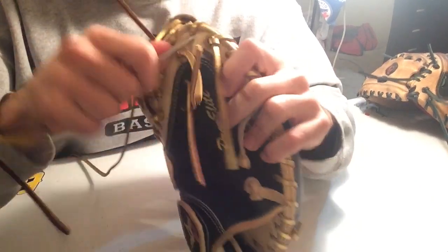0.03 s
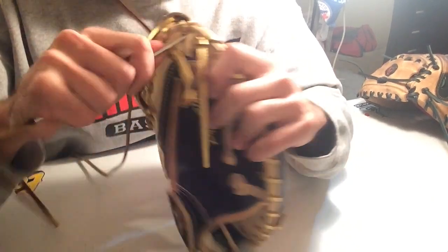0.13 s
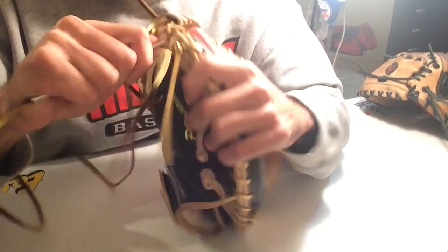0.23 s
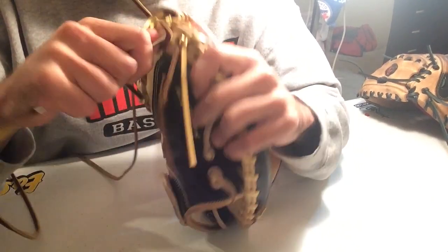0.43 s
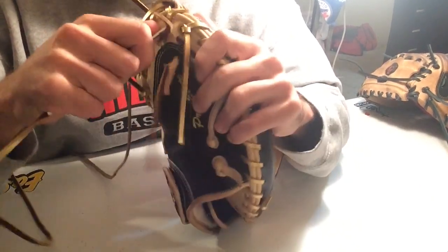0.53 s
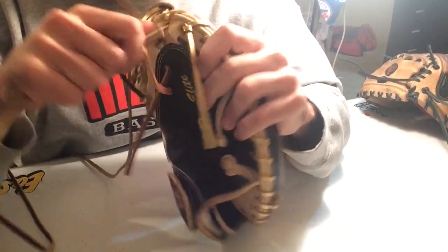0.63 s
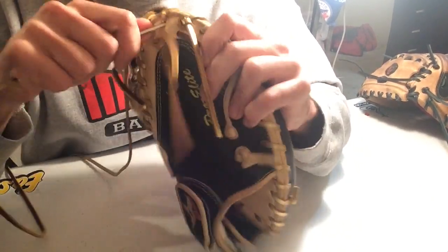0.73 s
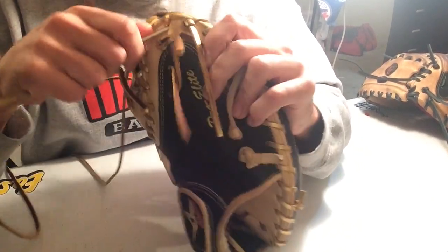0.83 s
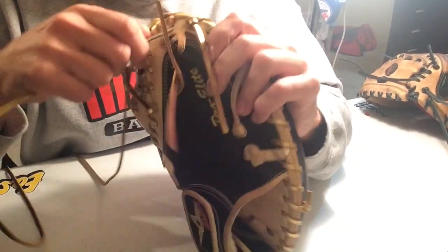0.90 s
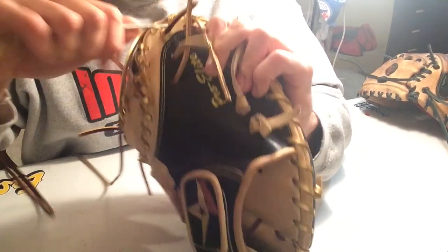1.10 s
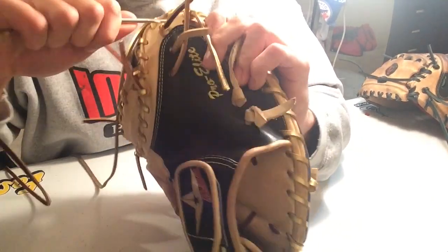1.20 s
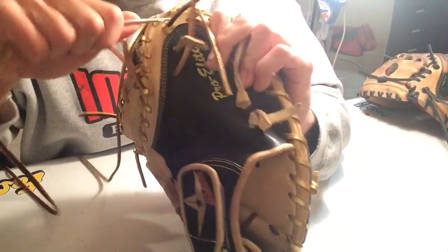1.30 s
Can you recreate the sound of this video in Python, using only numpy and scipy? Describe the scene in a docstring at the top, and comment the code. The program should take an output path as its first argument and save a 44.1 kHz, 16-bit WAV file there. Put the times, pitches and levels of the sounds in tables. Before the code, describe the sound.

A leather mitt scuffs and judders over a tabletop, close up in a quiet room. At about 0.3 seconds it knocks down with a sharp snap and a low thump, the loudest moment. From 0.5 seconds hands rub the leather faintly, with soft finger bumps and a dull tap near 0.75. The pulled lace ticks quickly between 0.8 and 1 second, and light rubbing continues until about 1.3.

```python
"""Leather mitt on a table

Close up in a quiet room, a leather mitt scuffs and judders over a tabletop, sticking and slipping.
It knocks down: a stiff edge snaps, then its weight rings the table with a low thump.
Hands and lace rub the hollow leather, fingers bump the padding and tap the rim,
and the lace slips in a short run of ticks as it is pulled."""
import sys
import numpy as np
from scipy import signal
from scipy.fft import rfft, irfft, next_fast_len
from scipy.io import wavfile
from scipy.ndimage import map_coordinates

SR = 44100
rng = np.random.default_rng(int(sys.argv[2]) if len(sys.argv) > 2 else 0)


def master_out(mix):
    """Clip the mix to full scale and print it as 16-bit PCM to the path in sys.argv[1]."""
    frames = np.transpose(np.atleast_2d(mix))
    ceiling = np.clip(frames, -1, 1)
    pcm = np.round(ceiling * 32767).astype(np.int16)
    wavfile.write(sys.argv[1], SR, pcm)


N = 59535

# colour of the room tone (f/Hz, level/dB)
ROOM_TONE_COLOUR = [(20, -38), (50, -7), (100, -5.5), (250, -19), (450, -17.5), (1000, -21), (2000, -31.5),
                    (5000, -37), (7300, -33), (9000, -38), (15500, -40.5)]
# the room's tail: colour (f/Hz, level/dB) and decay (f/Hz, t60/s)
TAIL_COLOUR = [(100, 1), (400, -4), (1200, -6), (4000, 4.5), (8000, -14), (15000, -2.5)]
TAIL_DECAY = [(200, 0.39), (1500, 0.061), (5000, 0.047), (14000, 0.12)]
# faint high background hiss: envelope (t/s, level/dB) and colour (f/Hz, level/dB)
HIGH_HISS_ENVELOPE = [(0, -81), (.1, -72.5), (.25, -73), (.45, -89), (.9, -83), (1.06, -79), (1.2, -81.5),
                      (1.27, -92.5)]
HIGH_HISS_COLOUR = [(2000, -28), (5000, -8), (7300, -0.5), (9000, -7), (15500, -12.5)]
# resonances of the hollow mitt when rubbed (f/Hz, width/Hz, boost/dB)
HOLLOW_RESONANCES = [(491, 67, 8.5), (915, 160, 1.5), (1277, 96, 5.5), (1805, 350, 5.5), (2890, 200, 5),
                     (4520, 360, 4)]
# hands and lace on the leather: envelope (t/s, level/dB) and colour (f/Hz, level/dB)
RUB_ENVELOPE = [(.38, -63), (.47, -69), (.512, -62.5), (.535, -77), (.595, -60), (.612, -76.5),
                (.66, -69.5), (.688, -68), (.705, -60.5), (.76, -64.5), (.78, -73.5), (.88, -65),
                (.93, -69.5), (1.0, -74), (1.05, -72), (1.135, -73), (1.16, -64.5), (1.21, -66),
                (1.25, -75.5)]
RUB_COLOUR = [(60, -19), (180, -8.5), (280, 0.5), (420, -10.5), (700, -13.5), (1100, -11), (1700, -17.5),
              (2300, -19), (4200, -23.5), (7500, -31.5), (15500, -39)]
# the mitt sliding on the table: envelope (t/s, level/dB) and colour (f/Hz, level/dB)
SLIDE_ENVELOPE = [(0, -53), (.04, -57.5), (.075, -71.5), (.12, -58), (.18, -52), (.225, -65), (.25, -57.5),
                  (.29, -55), (.32, -47), (.35, -55), (.39, -72), (.45, -66.5), (.6, -99)]
SLIDE_COLOUR = [(60, -28), (160, -1.5), (300, -10.5), (430, -21), (700, -26), (1100, -20.5), (2000, -31),
                (3300, -26.5), (5200, -31), (7800, -32.5), (10000, -35.5), (15500, -48)]
# bright scuff around the snap: envelope (t/s, level/dB) and colour (f/Hz, level/dB)
SCUFF_ENVELOPE = [(.24, -85), (.285, -61), (.3, -51), (.315, -48), (.325, -55), (.338, -53), (.365, -76),
                  (.385, -91), (.42, -110)]
SCUFF_COLOUR = [(200, -48), (550, -5), (1200, 3), (2300, -7.5), (4600, -4.5), (6000, -4.5), (8500, -8),
                (14000, -13.5), (15500, -23)]
# drag that shakes the tabletop (t/s, level/dB)
DRAG_ENVELOPE = [(0, -64), (.05, -68.5), (.09, -96), (.16, -53), (.22, -48.5), (.28, -51), (.36, -46.5),
                 (.43, -60.5), (.51, -59.5), (.6, -62), (.73, -70), (.8, -62.5), (.9, -73), (1.0, -68),
                 (1.35, -77)]
# modes of the tabletop (f/Hz, level/dB, t60/s)
TABLETOP_MODES = [(76.5, 2, .22), (100.3, -7, 0.15), (155.5, -12.5, 0.21), (215, -45, 0.06),
                  (253.3, -34, 0.41), (327, -28.5, 0.33)]
# runs of stick-slip on the table (centre t/s, length/s, level/dB, slip rate/Hz)
JUDDER_RUNS = [(.004, 0.029, -51.5, 63), (0.058, .06, -52, 76), (0.135, 0.04, -43.5, 82),
               (.175, 0.083, -44.5, 133.6), (0.216, .11, -38.5, 95), (0.473, .09, -51, 69),
               (0.889, .08, -61.5, 68)]
# soft finger bumps (t/s, level/dB) and the padding's modes (f/Hz, level/dB, t60/s)
FINGER_BUMPS = [(0.516, -50), (0.724, -59), (.735, -48), (1.206, -59), (1.329, -55.5)]
PADDING_MODES = [(277.4, -0.5, 0.058), (359, -1, 0.049), (492, -5.5, 0.033), (1260, -3, 0.022)]
# modes of the stiff leather rim (f/Hz, level/dB, t60/s)
RIM_MODES = [(1146, 2, 0.01), (1670, -6, 0.016)]
# slips of the lace (t/s, level/dB, tilt/dB per octave, crack relative to the slip/dB)
LACE_SLIPS = [(0.807, -52.5, 0, -29), (0.8274, -51, -0.5, 3), (.8427, -47.5, 0.5, -1),
              (.854, -41.5, 2, -3.5), (0.956, -71, 7, -1), (0.965, -59.5, 5, 7.5)]
# the taut lace: modes (f/Hz, level/dB, t60/s) and colour of its crack (f/Hz, level/dB)
LACE_MODES = [(1100, 2, 0.0093), (1270, 8, 0.0085), (1487, -1.5, 0.016), (1980, 2, .016),
              (2170, -0.5, .011), (2690, -10.5, 0.015), (3510, -9.5, 0.014), (4260, -9.5, 0.012),
              (7630, -13, 0.01)]
LACE_CRACK_COLOUR = [(500, -39), (1100, 17), (4500, 4), (6000, -1), (7800, -1), (8800, -1), (10500, 0),
                     (15000, -10)]
# hits of the mitt's edge (t/s, level/dB) and its modes (f/Hz, level/dB, t60/s)
EDGE_HITS = [(0.3039, -18.5), (.3355, -53)]
EDGE_MODES = [(901, -9.5, 0.032), (987, -5.5, .018), (1860, -3, 0.007), (2200, -4.5, 0.0062),
              (3230, -7, 0.0086), (4400, -1, 0.0065), (5270, -2.5, 0.0052), (6460, -2.5, .004)]
# the padded body's brief push under a snap (f/Hz, level/dB, t60/s)
BODY_MODES = [(216.7, -4.5, 0.048)]


def amp(db):
    """Decibels to gain."""
    return 10 ** (np.asarray(db) / 20)


def unit(x):
    """Scale to rms 1."""
    return x / np.sqrt(np.mean(x ** 2) + 1e-20)


def add(out, at_s, x):
    """Mix x into out, starting at at_s."""
    part = out[round(at_s * SR):][:len(x)]
    part += x[:len(part)]


def along(points, hz):
    """Read (f/Hz, value) points on a log frequency axis."""
    f, values = np.transpose(points)
    return np.interp(np.log(hz + 1), np.log(f + 1), values)


def envelope(points):
    """Gain at each sample from (t/s, level/dB) points."""
    return amp(np.interp(np.arange(N) / SR, *np.transpose(points)))


def filtered(x, response):
    """Shape x with a gain given as a function of frequency."""
    size = next_fast_len(N + SR // 2)
    return irfft(rfft(x, size) * response(np.fft.rfftfreq(size, 1 / SR)), size)[:N]


def coloured(x, colour):
    """Equalise x with a colour curve and bring it to rms 1."""
    return unit(filtered(x, lambda hz: amp(along(colour, hz))))


def low_cut(x, hz):
    """Thin out the lows at 12 dB per octave."""
    return signal.sosfilt(signal.butter(2, hz, "high", fs=SR, output="sos"), x)


def resonance(f, centre_hz, width_hz):
    """Band-pass response of one resonance, 1 at its centre."""
    return 1j * f * width_hz / (centre_hz ** 2 - f ** 2 + 1j * f * width_hz)


def ring(modes, attack_s, tilt_db=0):
    """Struck modes dying away, tilted by tilt_db per octave above the lowest."""
    t = np.arange(SR // 2) / SR
    tones = np.zeros(len(t))
    for hz, db, t60 in modes:
        start_db = db + tilt_db * np.log2(hz / modes[0][0])
        tones += amp(start_db - 60 * t / t60) * np.sin(2 * np.pi * hz * t)
    return tones * (1 - np.exp(-t / attack_s))


def crack(t60_s, attack_s=0.00011):
    """The brief noise burst of a contact."""
    t = np.arange(SR // 2) / SR
    return rng.standard_normal(len(t)) * amp(-60 * t / t60_s) * (1 - np.exp(-t / attack_s))


def room_tone(level_db=-71.5):
    """A faint, dark bed of noise."""
    return amp(level_db) * coloured(rng.standard_normal(N), ROOM_TONE_COLOUR)


def room(x, wet_db):
    """x with the short tail of a small furnished room, where the lows hang longest."""
    hz, t, noise = signal.stft(rng.standard_normal(SR // 2), SR, nperseg=256)
    tail_db = along(TAIL_COLOUR, hz)[:, None] - 60 * t / along(TAIL_DECAY, hz)[:, None]
    _, tail = signal.istft(noise * amp(tail_db), SR, nperseg=256)
    predelay = np.zeros(SR // 400)
    impulse = np.concatenate([predelay, tail / np.linalg.norm(tail)])
    return x + amp(wet_db) * signal.fftconvolve(x, impulse)[:N]


def high_hiss():
    """A faint background hiss near 7 kHz that swells and fades."""
    return envelope(HIGH_HISS_ENVELOPE) * coloured(rng.standard_normal(N), HIGH_HISS_COLOUR)


def friction(colour, catches_per_s, grain_db):
    """Tiny catches of the leather's grain over a smooth hiss, through the hollow mitt."""
    def hollow(f):
        return 1 + sum((amp(db) - 1) * resonance(f, hz, width) for hz, width, db in HOLLOW_RESONANCES)

    hiss, sizes = rng.standard_normal((2, N))
    catches = sizes * (rng.random(N) < catches_per_s / SR)
    texture = hiss + amp(grain_db) * unit(catches)
    return coloured(filtered(texture, hollow), colour)


def leather_rubbing():
    """Hands and lace rub the mitt; the mitt slides on the table and scuffs as it jerks free."""
    hands = envelope(RUB_ENVELOPE) * friction(RUB_COLOUR, catches_per_s=770, grain_db=-3)
    slide = envelope(SLIDE_ENVELOPE) * friction(SLIDE_COLOUR, catches_per_s=1000, grain_db=-5.5)
    scuff = envelope(SCUFF_ENVELOPE) * friction(SCUFF_COLOUR, catches_per_s=1900, grain_db=-5.5)
    return hands + slide + scuff


def table_rumble(width_hz=34, low_cut_hz=70):
    """The dragging mitt shakes the tabletop and damps its modes into broad bands."""
    def tabletop(f):
        modes = sum(amp(db) * resonance(f, hz, width_hz) for hz, db, _ in TABLETOP_MODES)
        return modes * f ** 4 / (f ** 4 + low_cut_hz ** 4)

    return envelope(DRAG_ENVELOPE) * unit(filtered(rng.standard_normal(N), tabletop))


def mitt_judder(wander_depth=0.097, wander_hz=70, overtone_db=-13):
    """The mitt sticks and slips at an unsteady rate, in runs that swell and fade."""
    out = np.zeros(N)
    for centre_s, length_s, db, slip_hz in JUDDER_RUNS:
        t = np.arange(int(length_s * SR)) / SR
        wander = map_coordinates(rng.standard_normal(32), [t * wander_hz], mode="mirror")
        phase = 2 * np.pi * np.cumsum(slip_hz * np.exp(wander_depth * wander)) / SR
        buzz = np.sqrt(2) * (np.sin(phase) + amp(overtone_db) * np.sin(2 * phase))
        run = amp(db) * np.hanning(len(t)) * buzz
        out += np.interp(np.arange(N) / SR, centre_s - length_s / 2 + t, run)
    return out


def finger_bumps():
    """Fingers shift their grip and bump softly on the padding."""
    out = np.zeros(N)
    for at_s, db in FINGER_BUMPS:
        add(out, at_s, amp(db) * ring(PADDING_MODES, attack_s=0.0022))
    return out


def rim_tap(at_s=0.7472, gain_db=-37.5):
    """A fingertip gives the mitt's stiff rim one dull tap."""
    out = np.zeros(N)
    add(out, at_s, amp(gain_db) * ring(RIM_MODES, attack_s=0.0013))
    return out


def lace_ticks():
    """The lace sticks and slips as it tightens; each slip is a short ring and a crack."""
    tones, cracks = np.zeros((2, N))
    for at_s, db, tilt_db, crack_db in LACE_SLIPS:
        add(tones, at_s, amp(db) * ring(LACE_MODES, attack_s=0.0006, tilt_db=tilt_db))
        add(cracks, at_s, amp(db + crack_db) * crack(t60_s=0.0058))
    thin_ring = low_cut(tones, hz=860)  # a thin lace radiates little low end
    return thin_ring + filtered(cracks, lambda hz: amp(along(LACE_CRACK_COLOUR, hz)))


def table_thump(at_s=0.3102, gain_db=-17.5):
    """The mitt's weight lands and rings the tabletop's low modes."""
    out = np.zeros(N)
    add(out, at_s, amp(gain_db) * ring(TABLETOP_MODES, attack_s=0.00072))
    return low_cut(out, hz=78.4)  # the tabletop radiates little below this


def edge_snap(crack_db=-22):
    """A stiff edge of the mitt strikes just before its weight lands, and touches once more."""
    out = np.zeros(N)
    for at_s, db in EDGE_HITS:
        edge = ring(EDGE_MODES, attack_s=0.00029) + amp(crack_db) * crack(t60_s=0.015)
        body = ring(BODY_MODES, attack_s=0.0035)
        add(out, at_s, amp(db) * (edge + body))
    return out


def scene():
    """The handling over room tone, in mono; only snap, ticks and tap feed the room's tail."""
    background = room_tone() + high_hiss()
    snap = room(edge_snap(), wet_db=-10.5)
    handling = room(lace_ticks() + rim_tap(), wet_db=-13) + finger_bumps()
    table = table_thump() + mitt_judder() + table_rumble()
    return (background + leather_rubbing() + handling + table + snap)[None]


def record(dry):
    """A brick-wall high cut on the whole mix."""
    high_cut_hz = 15350
    return filtered(dry[0], lambda hz: 1 / np.sqrt(1 + (hz / high_cut_hz) ** 300))[None]


dry = scene()
out = record(dry)
master_out(out)
```